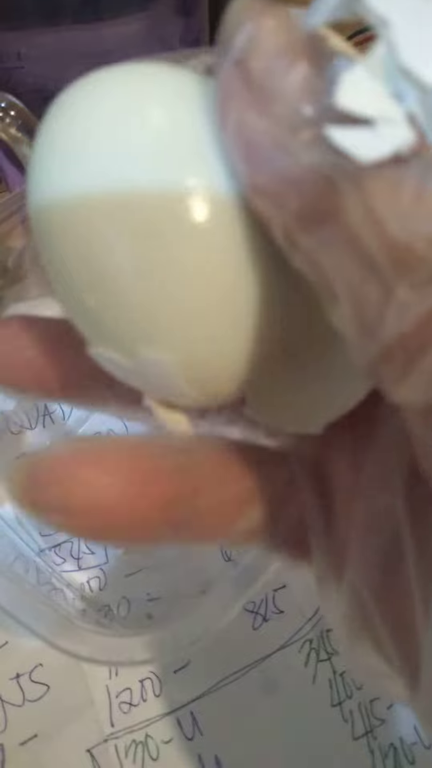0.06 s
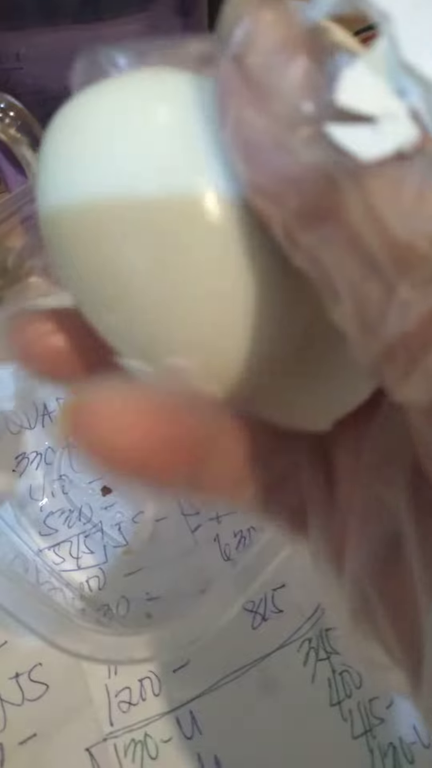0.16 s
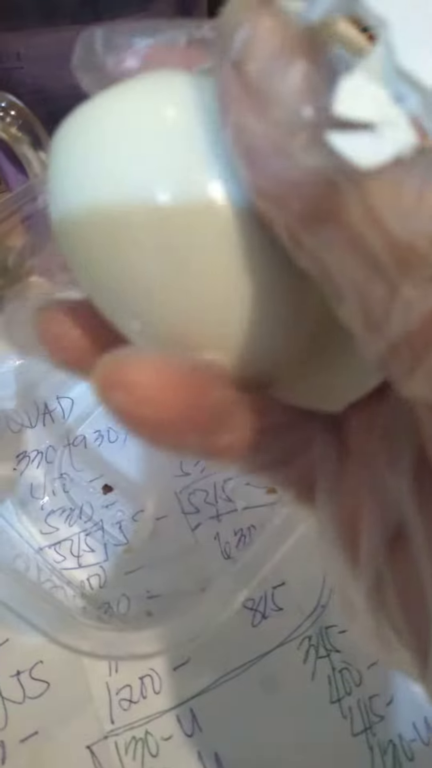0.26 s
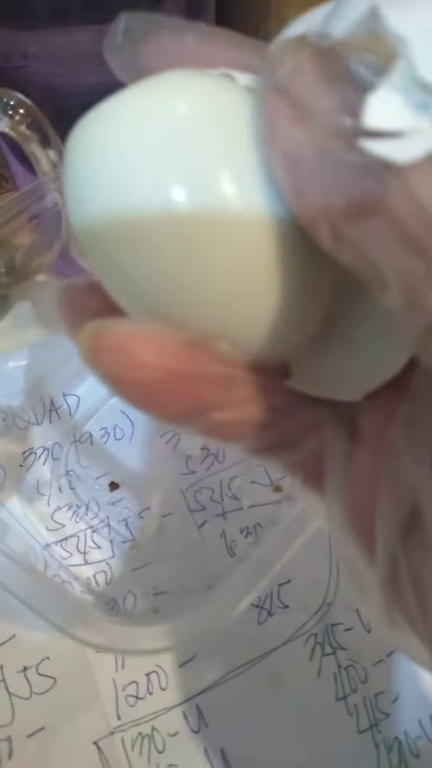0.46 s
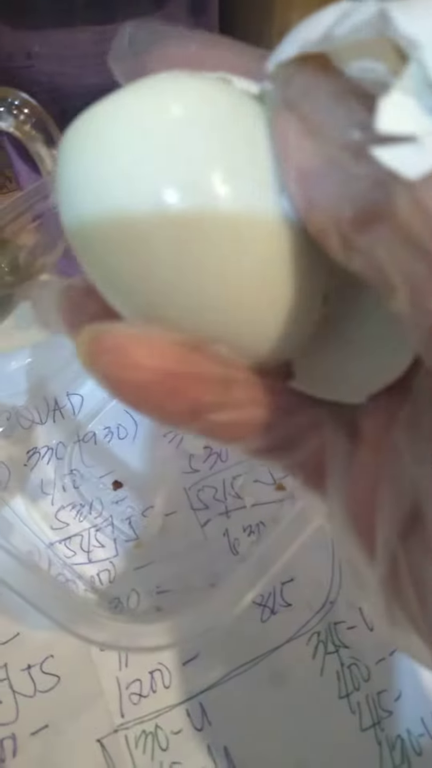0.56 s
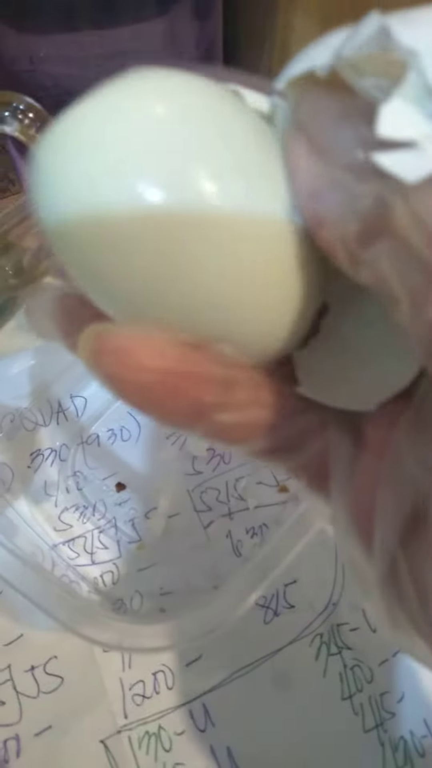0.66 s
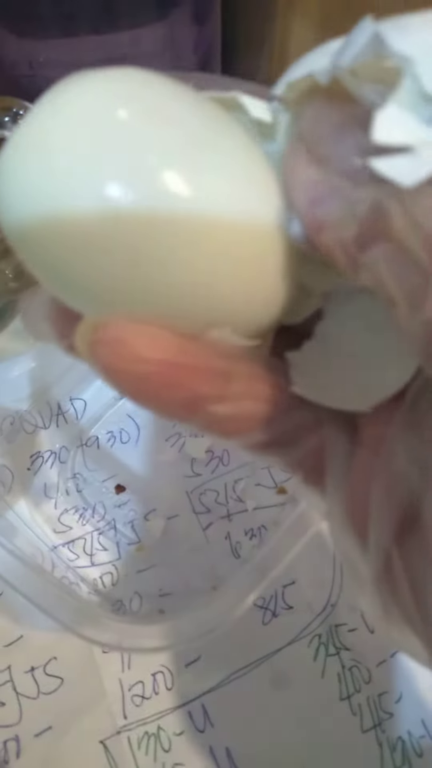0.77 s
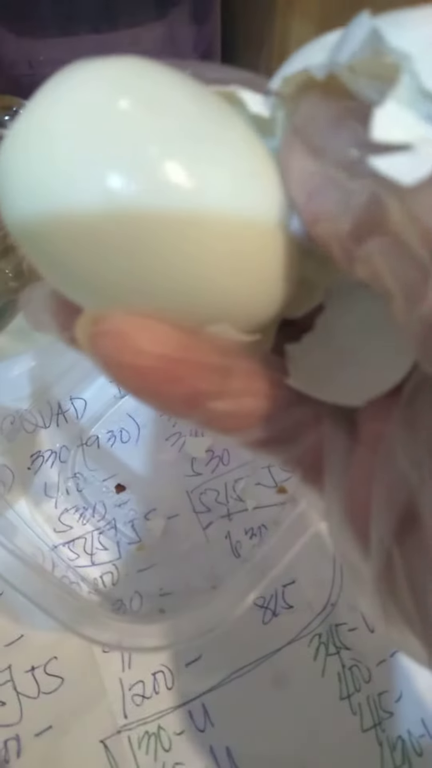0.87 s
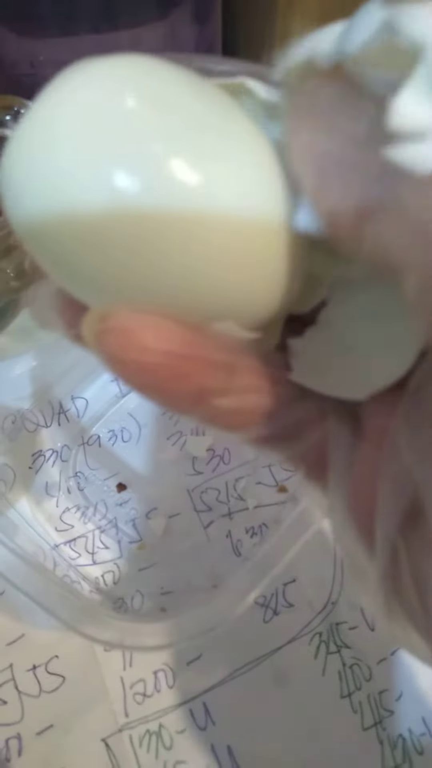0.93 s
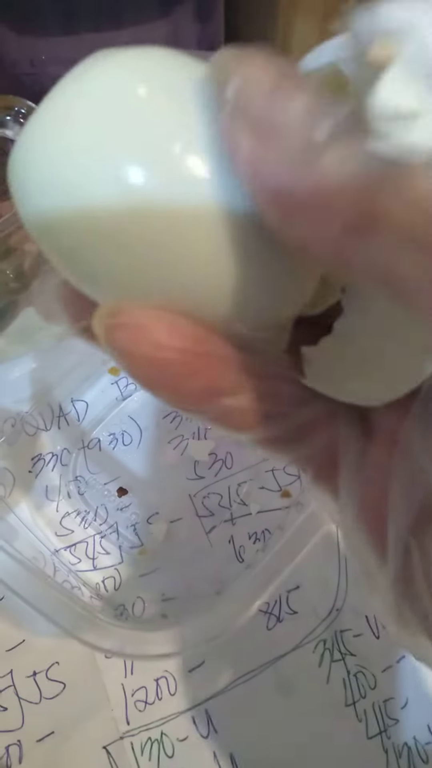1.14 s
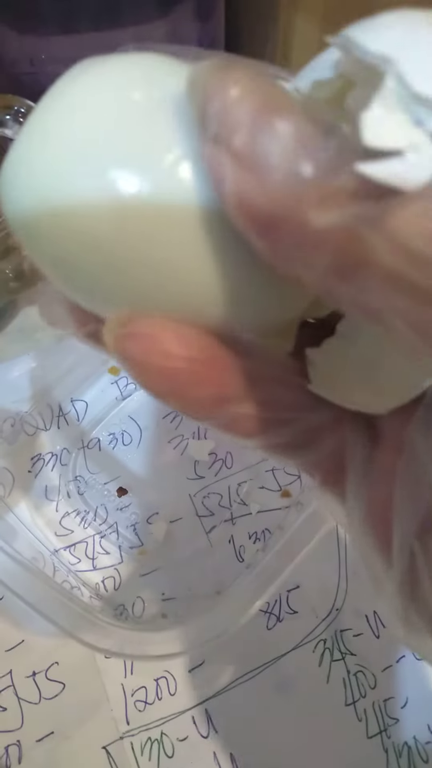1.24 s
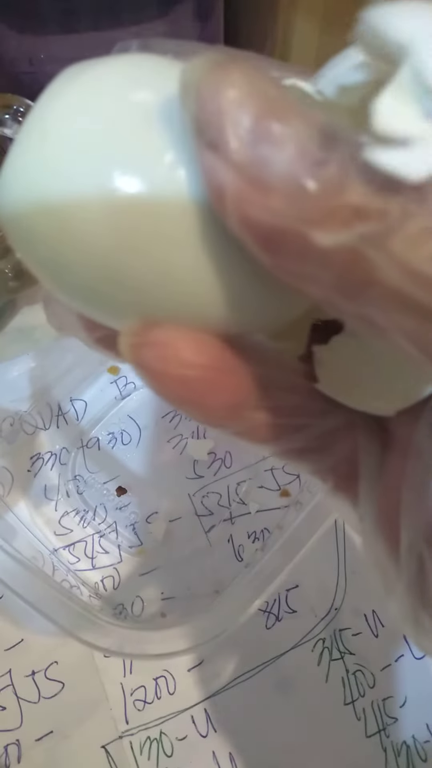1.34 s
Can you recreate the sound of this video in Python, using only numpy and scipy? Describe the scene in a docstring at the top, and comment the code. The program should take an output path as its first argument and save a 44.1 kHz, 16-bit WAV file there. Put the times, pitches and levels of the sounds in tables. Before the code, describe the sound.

Close up and slightly right, a boiled egg is peeled with fine crackling. Two shell pieces drop sharply into a plastic tub, more shell cracks and lifts with dull pops, and faint ticks follow over a low room rumble.

```python
"""Gloved fingers peel a boiled egg just right of a close stereo microphone, over a thin plastic tub.
The shell cracks in small ticks and lifts with two dull pops, while its membrane tears in a fine crackle.
Two bits of shell clack into the tub and set it ringing. Hands and table give short reflections;
the room is dry and quiet, with a low rumble, faint hiss and mains hum."""
import sys
import numpy as np
from scipy import signal
from scipy.fft import rfft, irfft
from scipy.io import wavfile

SR = 44100
rng = np.random.default_rng(int(sys.argv[2]) if len(sys.argv) > 2 else 0)


def file_out(sig):
    """Save sig as 16-bit WAV at sys.argv[1]."""
    # one column per channel
    cols = np.atleast_2d(sig).T
    # limit, then scale
    lim = np.clip(cols, -1, 1)
    pcm = np.round(lim * 32767).astype(np.int16)
    wavfile.write(sys.argv[1], SR, pcm)


N = 61739


def undb(db):
    return 10 ** (np.asarray(db) / 20)


def unit(x):
    """Scale to rms 1."""
    return x / np.sqrt(np.mean(x ** 2))


def sine(hz, t):
    """A sine at a random phase."""
    return np.sin(2 * np.pi * (hz * t + rng.random()))


def bins():
    """The filter grid, f/Hz."""
    return np.maximum(np.arange(N + 1) * SR / (2 * N), 1)


def curve(points):
    """Join (f/Hz, value) points on a log-frequency axis."""
    hz, value = np.array(points, float).T
    return np.interp(np.log(bins()), np.log(hz), value)


def colour(x, db, taps=1024):
    """Minimum-phase filter with the given dB on the filter grid."""
    log_gain = np.interp(np.linspace(0, SR / 2, taps + 1), bins(), db) * np.log(10) / 20
    cepstrum = irfft(log_gain)[:taps]
    cepstrum[1:] *= 2
    response = irfft(np.exp(rfft(cepstrum, 2 * taps)))[:taps]
    return signal.fftconvolve(x, response)[:len(x)]


def burst(env, db):
    """Noise under an envelope, evened out in frequency, then coloured; it keeps the envelope's energy."""
    noise = env * rng.standard_normal(len(env))
    for _ in range(6):
        flat_spectrum = np.exp(1j * np.angle(rfft(noise, 2 * len(env))))
        noise = env * np.sign(irfft(flat_spectrum)[:len(env)])
    noise = colour(noise, db)
    return noise * np.sqrt(np.sum(env ** 2) / np.sum(noise ** 2))


def place(x, pan_db, left_lag_s=0.00022, scatter_s=0.00068, scatter_share=0.35):
    """Two microphone ports, pan_db left minus right; the left hears late, partly scattered by fingers."""
    t = np.arange(SR // 250) / SR
    scatter = burst(np.exp(-t / scatter_s), np.zeros(N + 1))
    scattered = signal.fftconvolve(x, scatter)[:len(x)] / np.linalg.norm(scatter)
    left = np.sqrt(1 - scatter_share) * x + np.sqrt(scatter_share) * scattered
    left = np.pad(left, (round(left_lag_s * SR), 0))[:len(x)]
    shade = pan_db / 2 * np.ones(N + 1)
    return np.array([colour(left, shade), colour(x, -shade)])


def add(out, at, x):
    """Mix a short stereo sound in at a time in seconds."""
    start = int(at * SR)
    out[:, start:start + x.shape[1]] += x[:, :N - start]


def tail(x, bands, gap_s=0.0012):
    """A diffuse decay fed by the right channel, band by band, different at each port."""
    t, out = np.arange(SR // 3) / SR, []
    centres = np.log([row[0] for row in bands])
    for _ in range(2):
        noise, response = rfft(rng.standard_normal(len(t)), 2 * N), 0
        for (_, t60, db), share in zip(bands, np.eye(len(bands))):
            band = irfft(noise * np.interp(np.log(bins()), centres, share))[:len(t)]
            env = np.exp(-np.log(1000) * t / t60) * (t > gap_s)
            response += undb(db) * band * env / np.linalg.norm(env)
        out.append(signal.fftconvolve(x[1], response)[:N])
    return np.array(out)


# Room tone around the microphone: f/Hz, relative spectral level/dB
ROOM_SPECTRUM = [(20, -0.5), (58, 1), (80, -12), (135, -2), (170, -9.5), (280, -9), (400, -16.5),
                 (1000, -38.5), (1700, -50), (9000, -57.5), (16000, -68)]
# Mains hum, the same at both ports: f/Hz, level/dB
MAINS_HUM = [(99.9, -55), (200, -67), (252, -71.5), (292, -70)]
def room_tone(mid_db=-53.5):
    """Low rumble, alike at both ports, faint wide hiss and mains hum."""
    t, mid_shape = np.arange(N) / SR, curve(ROOM_SPECTRUM)
    side_shape = mid_shape + curve([(300, -10.5), (1497, 0)])
    mid = irfft(rfft(rng.standard_normal(2 * N)) * undb(mid_shape))[:N]
    side = irfft(rfft(rng.standard_normal(2 * N)) * undb(side_shape))[:N]
    hum = sum(undb(db) * np.sqrt(2) * sine(hz, t) for hz, db in MAINS_HUM)
    return undb(mid_db) * np.array([mid + side, mid - side]) / mid.std() + hum


# Ring of the shell at close range, in tears, cracks and chatter: f/Hz, relative level/dB
SHELL_RING = [(300, -12), (1300, -12.5), (2200, -0.5), (3500, -2), (5000, -1), (6200, -6), (7700, -2),
              (9400, 0), (11500, -8), (16000, -33.5)]
# Egg just right of the microphone, fingers shading the left port: f/Hz, left minus right level/dB
EGG_SHADE = [(900, -3.5), (2300, -7.5), (6800, -11), (9000, -1.5)]
# Pulls on the membrane: start t/s, end t/s, start level/dB, end level/dB
MEMBRANE_PULLS = [(0.031, 0.119, -76, -65.5), (0.263, 0.315, -53, -48.5), (0.362, 0.473, -55.5, -62.5),
                  (0.475, 0.537, -65.5, -63.5), (0.548, 0.611, -81, -59.5), (0.649, 0.677, -60.5, -51),
                  (0.685, 0.785, -46.5, -63.5), (0.983, 1.02, -70.5, -62)]
def membrane_tearing(snaps_per_s=1200, spread_db=4, slips_per_s=220, slip_db=4.5, rub_db=-7):
    """Dense tiny snaps of membrane that catch and slip, and a little glove rub, during each pull."""
    t, effort = np.arange(N) / SR, np.zeros(N)
    for start, end, start_db, end_db in MEMBRANE_PULLS:
        gate = np.clip(np.minimum(t - start, end - t) / 0.007 + 0.5, 0, 1)  # 7 ms edges
        effort += gate * undb(np.interp(t, [start, end], [start_db, end_db]))
    slips = undb(slip_db * np.interp(t * slips_per_s, np.arange(N), rng.uniform(-0.8, 1, N)))
    snaps = (rng.random(N) < snaps_per_s / SR) * rng.choice([-1., 1.], N)
    sizes = undb(spread_db * np.minimum(rng.exponential(size=N), 3))  # mostly small, a few large
    rub = undb(rub_db) * rng.standard_normal(N)
    crackle = colour(unit(slips * snaps * sizes) + rub, curve(SHELL_RING))
    return place(effort * unit(crackle), curve(EGG_SHADE))


# Cracks under the fingers, close right: t/s, level/dB, relative lift from 8 kHz up/dB
SHELL_CRACKS = [(0.052, -51, 3.5), (0.109, -47.5, 16), (0.1915, -62.5, -4), (0.2854, -33, -3),
                (0.2933, -35, -3), (0.2979, -33, -7), (0.374, -35.5, -13), (0.389, -42, -1),
                (0.404, -40, -22), (0.414, -35, -1), (0.4353, -38.5, -1.5), (0.461, -43.5, 6.5),
                (0.510, -41, 4.5), (0.575, -39.5, 5), (0.5937, -42, 14.5), (0.636, -56, 8),
                (0.6417, -50.5, 8), (0.655, -43, 5), (0.6638, -31.5, 10), (0.6699, -29, 12),
                (0.6815, -29.5, 1.5), (0.6946, -31.5, -6.5), (0.7045, -24.5, -4), (0.7099, -25.5, 6),
                (0.716, -33.5, 5.5), (0.7311, -36, 7), (0.737, -46, 0), (0.7547, -40, -5),
                (0.7598, -30.5, 7.5), (0.7616, -43, 7), (0.7716, -48, -3), (0.836, -70.5, -5.5),
                (0.8964, -67, -2), (0.9777, -59.5, -2), (0.9885, -55.5, 1), (1.002, -50, 1),
                (1.0139, -50, 8), (1.07, -66, 3), (1.080, -64, -0.5), (1.088, -61, 4), (1.127, -62.5, -1),
                (1.239, -64, 3), (1.3258, -64.5, -4.5)]
# Dull pops as the shell lifts off the egg: t/s, level/dB
LIFT_POPS = [(0.7038, -35.5), (0.717, -45.5)]
# Tone of a pop: f/Hz, relative level/dB
POP_SPECTRUM = [(120, 9), (300, 4), (900, 7), (9000, -92)]
def shell_cracking(rise_s=0.0013, fall_s=0.0006, pop_fall_s=0.0018):
    """Each crack runs for about a millisecond, gives way and rings the shell; lifting shell pops."""
    out, t = np.zeros((2, N)), np.arange(SR // 40) / SR
    env = np.minimum(t / rise_s, 1) ** 3 * np.exp(-np.maximum(t - rise_s, 0) / fall_s)
    shell, pan = curve(SHELL_RING), curve(EGG_SHADE)
    treble_shelf = curve([(5500, 0), (8000, 1)])
    for at, db, lift_db in SHELL_CRACKS:
        crack = burst(env, shell + treble_shelf * lift_db)
        add(out, at, place(undb(db) * crack, pan))
    for at, db in LIFT_POPS:
        pop = burst(np.exp(-t / pop_fall_s), curve(POP_SPECTRUM))
        add(out, at, place(undb(db) * pop, pan))
    return out


# Bits of shell landing, right of the microphone: t/s, bit level/dB, tub ring level/dB
LANDINGS = [(0.2471, -24.5, -33), (0.3233, -16.5, -30.5)]
# Brief modes of the shell, one list per bit: f/Hz, relative level/dB
SHELL_BIT_MODES = [
    [(2330, 0), (3230, -3), (3560, -1), (3930, -2), (4750, -7), (5350, -6), (6800, -10), (9800, -6)],
    [(2400, -2), (3100, -3), (3700, -4), (4380, -2), (4830, -2), (5340, 0), (6250, -2), (7120, 2),
     (8000, -1), (9400, -6), (11200, -10)],
]
# Tub under the hands, heard slightly left: f/Hz, t60/s, relative level/dB at first spot hit, at second
TUB_MODES = [(577, 0.06, 5, -11.5), (756, 0.091, -11.5, -3.5), (1010, 0.045, -3.5, -2),
             (1096, 0.12, -5, -3), (1615, .06, -3.5, -16), (2274, .06, 2.5, -15), (2200, 0.19, -6, -8),
             (2610, .055, -21, -3.5), (3180, 0.099, -15, -0.5), (3430, 0.08, -7, -12),
             (3805, 0.05, -6.5, -1.5), (4450, 0.06, -23.5, -3.5), (5720, 0.041, -14, -6)]
# Dense modes of the tub, heard wide: f/Hz, t60/s, level/dB relative to the chatter
TUB_DENSE_MODES = [(342, .15, -14.5), (930, 0.26, -3.5), (1584, 0.25, -11), (8000, 0.11, -20.5)]
def tub_clacks(hold_s=0.0012, fall_s=0.0012, chatter_db=-10.5, bit_pan_db=-10, tub_pan_db=4):
    """A bit of shell rings and chatters on the plastic for two milliseconds; the tub's modes ring on."""
    ringing, chatter, t = np.zeros((2, N)), np.zeros((2, N)), np.arange(SR // 5) / SR
    contact = np.exp(-np.maximum(t - hold_s, 0) / fall_s)
    tub_onset = 1 - np.exp(-t / 0.0011)
    low_cut = signal.butter(2, 1940, "high", fs=SR, output="sos")
    for spot, (at, bit_db, tub_db) in enumerate(LANDINGS):
        tones = unit(sum(undb(db) * sine(hz, t) for hz, db in SHELL_BIT_MODES[spot]))
        bit = signal.sosfilt(low_cut, contact * tones)
        add(ringing, at, place(undb(bit_db) * bit, bit_pan_db))
        add(chatter, at, place(undb(bit_db) * burst(contact, curve(SHELL_RING)), bit_pan_db))
        tub = sum(undb(spot_db[spot]) * sine(hz, t) * np.exp(-np.log(1000) * t / t60)
                  for hz, t60, *spot_db in TUB_MODES)
        tub /= tub[:SR // 100].std()
        add(ringing, at, place(undb(tub_db) * tub * tub_onset, tub_pan_db))
    return ringing + undb(chatter_db) * chatter + tail(chatter, TUB_DENSE_MODES)


# Reflections off hands and table, near the microphone: f/Hz, t60/s, level/dB relative to the source
NEAR_REFLECTIONS = [(700, 0.02, -9.5), (9000, 0.022, -15.5)]
def scene():
    """Egg and tub close up, with their short reflections, over the room tone."""
    close = tub_clacks() + shell_cracking() + membrane_tearing()
    return close + tail(close, NEAR_REFLECTIONS) + room_tone()


def record(dry, top_hz=16500):
    """The recorder cuts the top treble steeply."""
    return signal.sosfilt(signal.ellip(8, 0.2, 70, top_hz, fs=SR, output="sos"), dry)


dry = scene()
out = record(dry)
file_out(out)
```